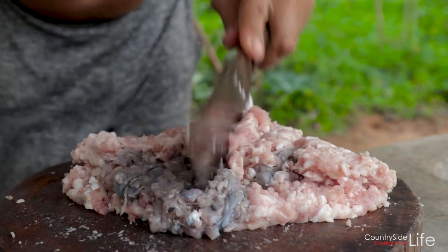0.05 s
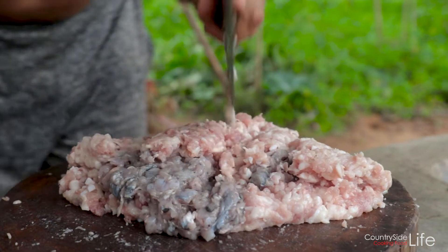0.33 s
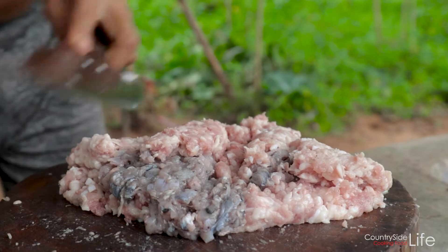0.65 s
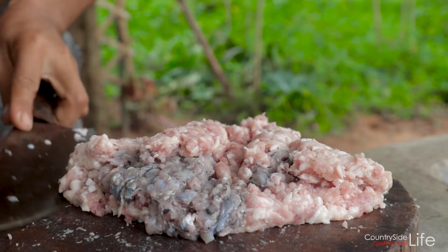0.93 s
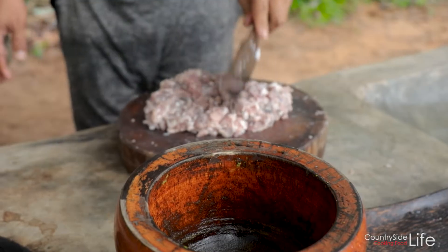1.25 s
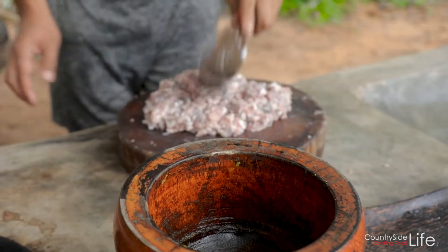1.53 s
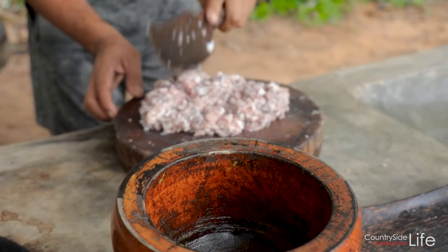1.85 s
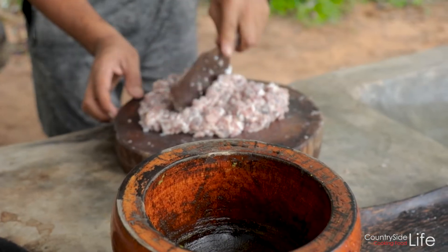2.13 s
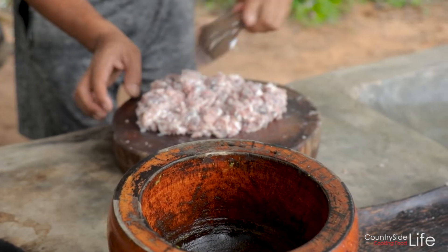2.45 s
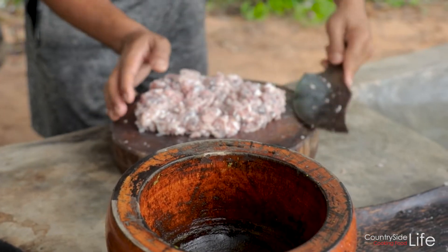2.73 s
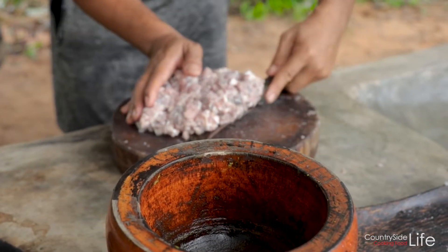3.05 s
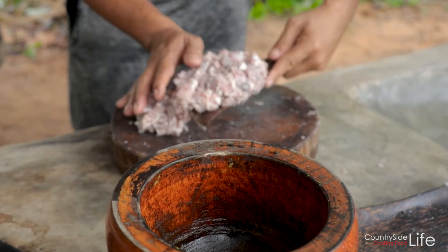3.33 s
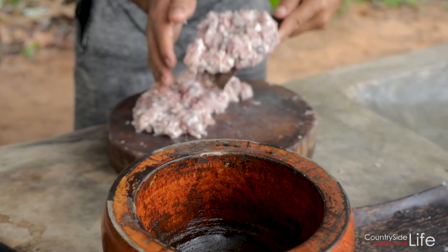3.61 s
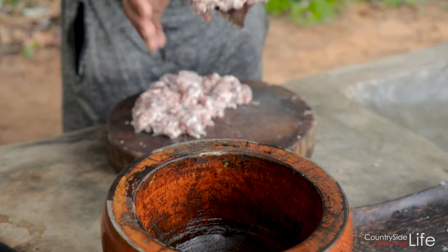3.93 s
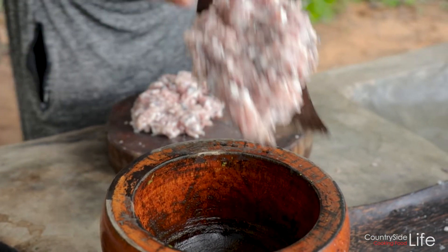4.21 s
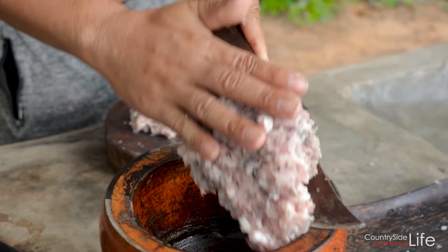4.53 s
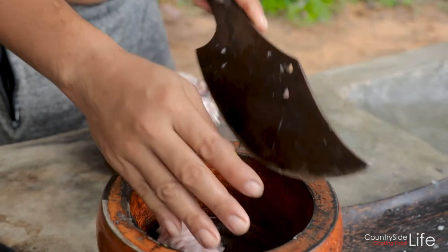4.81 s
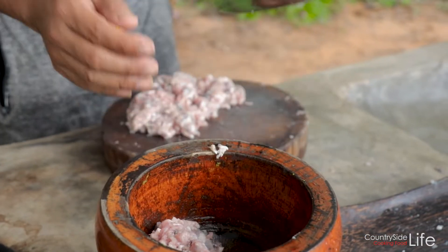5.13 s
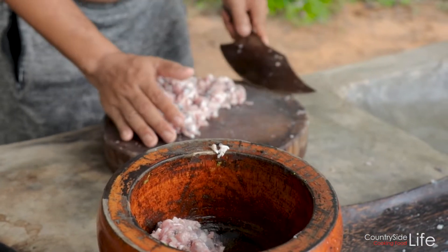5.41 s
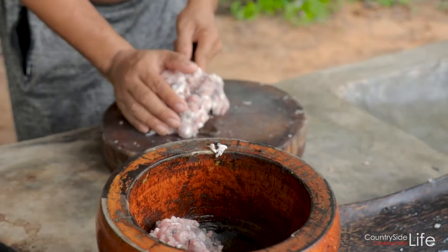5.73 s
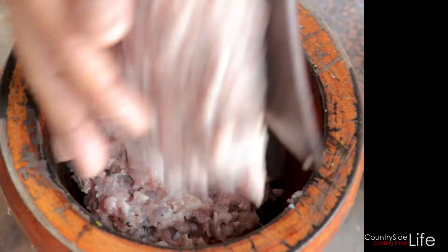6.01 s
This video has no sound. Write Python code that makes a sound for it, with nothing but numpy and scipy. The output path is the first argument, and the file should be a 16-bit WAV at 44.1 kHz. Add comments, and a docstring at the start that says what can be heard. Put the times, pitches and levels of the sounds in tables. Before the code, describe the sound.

Outdoors, over faint pulsing insects and a distant rumble, a heavy blade knocks twice through moist meat into a wooden block near the microphone. After a short pause with a metallic clink, seven fast chops of uneven strength follow. The rest is much quieter: steel drags and taps on the wood while wet mince is pushed together and wiped off the blade with soft, sticky sounds.

```python
"""A cleaver minces wet meat on a thick wooden block outdoors, in two quick runs. Each impact excites
the block's damped modes and squeezes the meat; the hardest blows clip briefly.
Between and after the runs the steel blade is set down, rings in its own modes and scrapes the
mince together by friction. Insects buzz over a faint hiss and a low distant rumble."""
import sys
import numpy as np
from scipy import signal
from scipy.fft import rfft, irfft, next_fast_len
from scipy.io import wavfile
from scipy.ndimage import uniform_filter1d

SR = 44100
rng = np.random.default_rng(int(sys.argv[2]) if len(sys.argv) > 2 else 0)


def generate_wav(signal):
    """Clip the signal to [-1, 1] and save it as 16-bit WAV at the path in sys.argv[1]."""
    frames = np.transpose(np.atleast_2d(signal))
    scaled = np.clip(frames, -1, 1) * 32767
    pcm = np.round(scaled).astype(np.int16)
    wavfile.write(sys.argv[1], SR, pcm)


N = 267674
T = np.arange(N) / SR

# chops through the meat:
# t/s, strength/dB, f_contact/Hz, after-ring/dB, sharp treble crack just after impact/dB, squelch/dB
CHOPS = [(0.223, 1.5, 1563, -1, -14.5, -29), (0.4352, -8, 1889, 2, -47, -38),
         (1.2190, -13.5, 1570, 1, -57, -38), (1.3972, 0.5, 1612, 1.5, -18.5, -38.5),
         (1.5980, -11, 1627, 4, -16, -32.5), (1.7922, -8, 1310, -0.5, -42, -34),
         (1.9748, 5.5, 1600, -2, -11, -35.5), (2.168, 0, 1492, 1.5, -22, -38),
         (2.3498, -3.5, 1340, 2, -19, -38.5)]
# normal modes of the wooden block: f/Hz, level/dB, t60/s
BLOCK_MODES = [(174, -26.5, .1), (215, -35.5, .09), (287, -30.5, .08), (365, -23.5, .08), (477, -30, 0.12),
               (632.2, -22, 0.08), (683, -22.5, 0.055), (800, -13, 0.051), (853.7, -16.5, 0.066),
               (1064, -21, 0.064), (1269, -25, .06), (1279.7, -18.5, 0.063), (1568, -14, 0.05),
               (1744, -15, 0.037), (1872, -20, 0.049), (2060, -23, 0.013), (2148, -24.5, 0.034),
               (2250, -30, .06), (2560, -20, 0.074), (2920, -32.5, 0.083), (3170, -32, 0.055),
               (3660, -39, .07), (3820, -35.5, 0.012), (4546, -33.5, .04)]
# normal modes of the steel blade: f/Hz, level/dB, t60/s
BLADE_MODES = [(582.7, 4, 0.096), (1428, 5.5, 0.17), (1560, 9, 0.033), (2154, 0, 0.14), (2670, 18.5, 0.019),
               (2960, 6, 0.057), (3438, 4, 0.14), (3920, -1.5, 0.16), (4046, 1, 0.22), (4490, 4, 0.1),
               (5500, -10, 0.12), (6850, -2, 0.11), (8290, 11, 0.043), (8260, -5, 0.067),
               (9330, -5.5, 0.1572), (9741, -7, .07), (11300, -4, 0.05), (11780, -19, 0.09),
               (13390, -22.5, .08), (14736, -18.5, .07)]
# spectrum of steel rubbing on wood: f/Hz, spectral level/dB
FRICTION_SPECTRUM = [(200, -18), (450, -2.5), (800, -5), (1100, -2.5), (1500, -7), (2500, -5), (4500, -6),
                     (5600, -10), (9000, -7.5), (15000, -9.5)]
# spectrum of wet crackle: f/Hz, spectral level/dB
WET_SPECTRUM = [(400, -9), (1500, -1.5), (4000, -3), (6500, -1.5), (10500, 1), (15500, -8.5)]
# left-right coherence of sound from the block: f/Hz, correlation
BLOCK_COHERENCE = [(50, .99), (250, .97), (500, .9), (1000, .85), (2000, .6), (4000, .35), (12000, .2)]


def chops():
    """Impact excitation: each blow knocks and rings the block; reflection and scattering follow."""
    # sound scattered by the table, mortar and yard: f/Hz, spectral level/dB
    scatter = [(130, -13.5), (400, -4), (800, -1.5), (1700, -6), (2600, -4.5), (3900, -10.5), (5200, -28.5),
               (10000, -28), (16000, -34.5)]
    echo_s, build_s, crack_delay_s = .0103, .0005, .001
    out, t = np.zeros((2, N)), T[:SR * 2 // 5]
    for s, db, contact_hz, bright_hz, ring_db, crack_db in blows():
        direct = knock(t) + bite(t, contact_hz)
        detuning = 1 + .0095 * rng.standard_normal()   # meat under the edge shifts the modes
        body = ring(BLOCK_MODES, t * detuning, vary_db=2)
        near_db = -10 - 3.5 * (t < echo_s)   # thin until the first reflection
        near = noise(scatter, len(t)) * decay(t, near_db, t60=.061)
        far = noise(scatter, len(t)) * decay(t, -41, t60=.36)
        blow = direct + (from_db(ring_db) * (body + near) + far) * (1 - np.exp(-t / build_s))
        add(blow, echo_s, from_db(ring_db - 16.5) * direct)   # ground reflection
        # a shorter contact favours higher tones
        blow = blow + from_db(-5.5) * resonate(blow, contact_hz, width_hz=1.1 * contact_hz)
        add(out, s, from_db(db) * band(blow, low_hz=186, high_hz=bright_hz))
        crack = low_pass(noise(WET_SPECTRUM, len(t)), hz=6350)
        add(out, s + crack_delay_s, decay(t, crack_db, t60=.012) * crack)
    return out


def blows():
    """Contact stiffness: harder chops are brighter. Lists the chops, then the light taps."""
    # the blade touching or bouncing on wood: t/s, strength/dB, f_contact/Hz, f_cutoff/Hz, after-ring/dB
    taps = [(0.022, -24, 500, 1810, -6), (0.2328, -12.5, 2430, 4200, 0), (0.8818, -15, 1988, 3820, 3),
            (0.9126, -28, 1500, 2200, 6), (1.056, -33, 1285, 1530, 10), (1.071, -27.5, 730, 1100, 3),
            (2.7863, -26, 1400, 3490, 1.5), (2.798, -26.5, 1350, 3000, -2),
            (3.4648, -28.5, 1230, 1900, 3.5), (3.477, -24.5, 1070, 1700, -0.5),
            (4.780, -29, 1725, 3020, -8), (5.426, -37, 3625, 4000, -1), (5.4593, -22.5, 960, 1386, -2),
            (5.716, -37, 846, 1400, -1.5)]
    chop_bright_hz, db_per_octave, tap_crack_db = 2700, 16.5, -36
    hard = [(s, db, hz, chop_bright_hz * 2 ** (db / db_per_octave), ring_db, crack_db)
            for s, db, hz, ring_db, crack_db, _ in CHOPS]
    light = [(s, db, hz, bright_hz, ring_db, db + tap_crack_db)
             for s, db, hz, bright_hz, ring_db in taps]
    return hard + light


def knock(t, rise_s=.0018, lag_s=.00003):
    """Heavy damping: block and blade swing together a few times, out of step at left and right."""
    # modes of block and blade in contact: f/Hz, relative level/dB, t60/s
    coupled_modes = [(565, -11.5, .014), (873, -9, 0.017), (1379, -2.5, 0.01), (2594, -3.5, 0.0091),
                     (4596, -1.5, .006)]
    out = 0
    for k, (hz, db, t60) in enumerate(coupled_modes):
        sign = (-1) ** k
        lag = lag_s * sign * np.array([[1], [-1]])
        out = out + sign * decay(t, db, t60) * np.sin(2 * np.pi * hz * (t + lag))
    return 2 * out * (1 - np.exp(-t / rise_s))


def bite(t, hz, contact_s=.0036):
    """Contact resonance: the blade quivers for a few cycles until its edge lodges in the wood."""
    envelope = np.sin(np.pi * np.minimum(t / contact_s, 1)) ** 2
    return from_db(-8.5) * envelope * np.sin(2 * np.pi * hz * t)


def squelches(sink_s=.007, fall_s=.0013, peel_s=.058, peel_width_s=.015, thud_rise_s=.00076):
    """Compression of wet meat: it is squeezed, thuds and spatters, then the blade peels out."""
    # the meat cushioning the blade: f/Hz, spectral level/dB
    cushion = [(110, -4), (170, -0.5), (400, 0), (800, -12.5), (2000, -20), (4500, -21.5)]
    out, t = np.zeros((2, N)), T[:SR // 5] - .05   # the edge meets wood at t = 0
    for s, *_, squelch_db in CHOPS:
        squeeze = np.exp(np.minimum(t / sink_s, -t / fall_s))
        spatter = decay(np.abs(t), -7, t60=.1) * (t > 0)
        peel = from_db(-18.5) * np.exp(-((t - peel_s) / peel_width_s) ** 2)
        crackle = noise(WET_SPECTRUM, len(t)) * grain(per_s=2400, depth_db=6.5, size=len(t))
        thud = noise(cushion, len(t)) * np.minimum(np.exp(t / thud_rise_s), decay(t, 0, t60=.09))
        squelch = (squeeze + spatter + peel) * crackle + from_db(7.5) * thud
        add(out, s + t[0], from_db(squelch_db) * squelch)
    return out


def clinks():
    """Free vibration: with little meat to damp it, the blade clacks and rings."""
    # bare steel touching wood: t/s, level/dB, damping by hand and meat (1 = free)
    touches = [(0.8825, -32, 1.03), (2.785, -47, 1.54), (3.464, -60.5, 1.4), (5.424, -57.5, 7.5)]
    out, t = np.zeros((2, N)), T[:SR // 2]
    for s, db, damping in touches:
        clack = noise(FRICTION_SPECTRUM, len(t)) * decay(t, -4.5, t60=.059)
        steel = ring(BLADE_MODES, t, vary_db=0, damping=damping)
        add(out, s, from_db(db) * (steel + clack))
    return out


def scrapes():
    """Sliding friction: the edge rubs on wood and each blade mode catches and lets go by itself."""
    # drags of the blade, duller the flatter it lies:
    # t_start/s, t_peak/s, t_end/s, level/dB, f_cutoff/Hz, steel ring/dB, fade before lifting/dB
    drags = [(0.971, 1.045, 1.056, -39, 13480, 5, 4), (2.964, 2.992, 2.964, -45.5, 6500, 11, 9.5),
             (3.461, 3.494, 3.606, -45.5, 3270, 12, 14), (3.819, 3.818, 3.95, -50.5, 5000, 4, 12.5),
             (3.946, 3.965, 4.08, -53, 7100, 3, 14), (4.325, 4.337, 4.36, -54, 4020, 0.5, 9),
             (4.769, 4.784, 4.8, -48, 4000, 15, 13), (5.486, 5.547, 5.79, -43, 14540, 9, 16),
             (5.602, 5.627, 5.72, -43.5, 3470, 6, 15)]
    rub = noise(FRICTION_SPECTRUM) * grain(per_s=680, depth_db=3.5)
    steel = sum(resonate(rub * grain(per_s=50, depth_db=3.5), hz, width_hz=43 + .01051 * hz)
                for hz, _, _ in BLADE_MODES)
    out = 0
    for *push, cutoff_hz, steel_db, fade_db in drags:
        scrape = low_pass(rub + from_db(steel_db) * steel, cutoff_hz, order=4)
        out = out + stroke(*push, rise_db=7.5, fall_db=fade_db) * unit_rms(scrape)
    return out


def judder():
    """Stick-slip: uneven slips of the edge drive the block's modes, most near the stroke's pitch."""
    # the edge pressed along the wood: t_start/s, t_knee/s, t_end/s, level/dB, f/Hz
    presses = [(3.466, 3.476, 3.59, -45, 860), (5.478, 5.582, 5.74, -49.5, 686)]
    slips = noise(FRICTION_SPECTRUM) * grain(per_s=330, depth_db=6)
    wood = sum(from_db(db) * resonate(slips, hz, width_hz=81) for hz, db, _ in BLOCK_MODES)
    return sum(stroke(*push, rise_db=-1.5, fall_db=12) * unit_rms(resonate(wood, hz, width_hz=460))
               for *push, hz in presses)


def mince():
    """Adhesion: sticky mince crackles as it is handled, strands snap and the heap thumps softly."""
    # mince pushed, lifted or wiped off the blade: t_start/s, t_peak/s, t_end/s, relative level/dB
    smears = [(0.0, 0.016, 0.035, -41.5), (0.037, 0.113, 0.27, -55), (2.888, 3.017, 3.14, -53.5),
              (3.231, 3.434, 3.73, -61.5), (3.62, 3.656, 3.7, -65), (3.907, 3.937, 4.21, -55.5),
              (4.605, 4.7, 4.98, -60), (5.146, 5.192, 5.2, -61), (5.936, 6.019, 6.24, -55)]
    # strands snapping off the blade: t/s, level/dB
    snaps = [(0.012, -46), (1.387, -46), (1.769, -39.5), (3.15, -41.5), (3.164, -43.5), (4.686, -46.5),
             (4.712, -45), (4.822, -39)]
    # thumps of the heap: t/s, level/dB, f/Hz, t60/s
    thumps = [(0.023, -19.5, 505, 0.022), (1.071, -27, 397, 0.028), (3.473, -27, 292, 0.056)]
    handling = from_db(3.5) * sum(stroke(*push, rise_db=9, fall_db=10.5) for push in smears)
    out = handling * noise(WET_SPECTRUM) * grain(per_s=1300, depth_db=4) * grain(per_s=110, depth_db=2)
    t = T[:SR // 4]
    for s, db in snaps:
        snap = band(noise(WET_SPECTRUM, len(t)), low_hz=5990, high_hz=15000)
        add(out, s, decay(t, db, t60=.017) * snap)
    for s, db, hz, t60 in thumps:
        add(out, s, decay(t, db, t60) * np.sin(2 * np.pi * hz * t))
    return out


def chirping_insect(chirps_per_s=5.4, first_s=.13):
    """Amplitude modulation: an insect pulses its buzz at a steady pace and wavering strength."""
    # the insect's slow changes of strength: t/s, relative level/dB
    strength = [(0, -0.5), (3.2, 2), (4.4, -7), (6.1, -5)]
    pulses = np.clip(.67 + np.cos(2 * np.pi * chirps_per_s * (T - first_s)), 0, 1)
    waver = grain(per_s=24, depth_db=2)
    return from_db(-67) * level(strength) * pulses * waver * buzz(hz=5940, width_hz=330)


def calling_insect(first_s=2.23, period_s=.503, length_s=.24, swell_s=.092, fade_s=.051):
    """Slow amplitude modulation: a higher insect calls seven times, each call louder than the last."""
    calls = 0
    for k in range(7):
        start = first_s + k * period_s
        end, db = start + length_s, -69 + 1.9 * k
        calls = calls + level([(start - swell_s, db - 18), (start + swell_s, db),
                               (end, db - .5), (end + fade_s, db - 18)])
    return calls * buzz(hz=9070, width_hz=580)


def buzz(hz, width_hz):
    """Narrow-band noise: an insect's rasp around one frequency."""
    return noise([(hz - 2 * width_hz, -30), (hz - width_hz, -14), (hz, 0),
                  (hz + width_hz, -14), (hz + 2 * width_hz, -30)])


def yard():
    """Ambient field: insects over hiss and distant rumble, which lose coherence towards the treble."""
    # background hiss: f/Hz, spectral level/dB
    hiss_spectrum = [(200, -3), (330, -2.5), (600, -6), (1100, -9.5), (1450, -8), (2500, -13),
                     (5200, -15.5), (7500, -16.5), (11500, -15), (13500, -9.5), (14700, -15),
                     (17000, -25.5)]
    # level of the hiss over time, louder after 1.1 s: t/s, relative level/dB
    hiss_level = [(0, -2.5), (1.1, 1), (1.2, 2), (5.8, 1), (5.87, 2), (6.2, -0.5)]
    # distant rumble: f/Hz, spectral level/dB
    rumble_spectrum = [(20, -30.5), (42, -23), (56, 3.5), (76, -7), (105, -3.5), (125, 1), (150, -7.5),
                       (185, -11), (208, -8), (245, -20.5), (330, -33)]
    # left-right coherence of the yard: f/Hz, correlation
    coherence = [(60, .985), (130, .96), (230, .87), (420, .35), (1000, .35), (2000, .2), (4000, .03)]
    hiss = from_db(-57) * level(hiss_level) * noise(hiss_spectrum, coherence=coherence)
    insects = chirping_insect() + calling_insect()
    rumble = from_db(-50) * noise(rumble_spectrum, coherence=coherence)
    return pan(hiss + insects, left_db=-.5321) + pan(rumble, left_db=.7)


def ring(modes, t, vary_db, damping=1):
    """Modal superposition: damped sines of alternating sign, whose levels vary with the point struck."""
    hz, db, t60 = np.transpose(modes)[:, :, None]
    index = np.arange(len(hz))[:, None]
    struck_db = db + vary_db * rng.standard_normal(hz.shape)
    gain = (-1) ** index * decay(damping * t, struck_db, t60)
    # high modes reach the two sides out of step
    phase = np.arccos(at_hz(BLOCK_COHERENCE, hz)) * (-1) ** (index // 2) / 2
    return np.array([np.sum(gain * np.sin(2 * np.pi * hz * t + side * phase), axis=0)
                     for side in (1, -1)])


def noise(spectrum, size=N, coherence=BLOCK_COHERENCE):
    """Partial coherence: coloured stereo noise, alike in the bass and diffuse in the treble; rms 1."""
    n_fft = next_fast_len(size, True)
    hz = np.fft.rfftfreq(n_fft, 1 / SR)
    alike = np.clip(at_hz(coherence, hz), 0, 1)
    mid, side = rfft(rng.standard_normal((2, n_fft)))
    passband = 1 / (1 + (hz / spectrum[-1][0]) ** 16) / (1 + (spectrum[0][0] / (hz + 1)) ** 4)
    pair = np.sqrt(1 + alike) * mid + np.sqrt(1 - alike) * side * [[1], [-1]]
    return unit_rms(irfft(pair * passband * from_db(at_hz(spectrum, hz)), n_fft)[:, :size])


def grain(per_s, depth_db, size=N):
    """Random modulation: a gain that moves to a new value per_s times a second; rms 1."""
    knots = np.clip(rng.standard_normal(size), -2, 2)
    return unit_rms(from_db(depth_db * np.interp(T[:size] * per_s, np.arange(size), knots)))


def stroke(start, knee, end, db, rise_db, fall_db, attack_s=.012, release_s=.018):
    """Envelope of a hand stroke: it takes hold, reaches db at the knee, eases off and lets go."""
    return level([(start - attack_s, db - 25), (start, db - rise_db), (knee, db),
                  (end, db - fall_db), (end + release_s, db - 40)])


def level(rows):
    """Envelope through rows of t/s, level/dB; silent outside them."""
    s, db = np.transpose(rows)
    return from_db(np.interp(T, s, db, left=-150, right=-150))


def decay(t, db, t60):
    """Exponential decay from db, by 60 dB in t60 seconds."""
    return from_db(db - 60 * t / t60)


def resonate(x, hz, width_hz):
    """Second-order resonance with unit peak gain."""
    return signal.lfilter(*signal.iirpeak(hz, hz / width_hz, SR), x)


def band(x, low_hz, high_hz):
    """Band-pass with first-order slopes."""
    sos = signal.butter(1, [low_hz, min(high_hz, .45 * SR)], "band", fs=SR, output="sos")
    return signal.sosfilt(sos, x)


def low_pass(x, hz, order=1):
    """Attenuation above a cutoff."""
    return signal.sosfilt(signal.butter(order, min(hz, .45 * SR), fs=SR, output="sos"), x)


def add(out, s, sound):
    """Superposition of a sound from time s."""
    at = round(s * SR)
    sound = sound[..., max(-at, 0):out.shape[-1] - at]
    out[:, max(at, 0):max(at, 0) + sound.shape[-1]] += sound


def pan(x, left_db):
    """Level difference: the left gains left_db and the right loses as much."""
    return x * from_db([[left_db], [-left_db]])


def at_hz(points, hz):
    """Interpolation on a log-frequency axis."""
    known, values = np.transpose(points)
    return np.interp(np.log(hz + 1), np.log(known), values)


def from_db(db):
    """Level to amplitude ratio."""
    return 10 ** (np.asarray(db) / 20)


def unit_rms(x):
    """Normalisation to rms 1."""
    return x / np.sqrt(np.mean(x ** 2) + 1e-20)


def scene():
    """Superposition: block and blade close by, the yard behind them."""
    work = chops() + squelches() + clinks() + scrapes() + judder() + mince()
    return pan(work, left_db=.64) + yard()


def record(dry):
    """Clipping and band limiting: the loudest knocks clip, the level dips briefly, the top is cut."""
    dip_start_s, dip_end_s, dip_db, cutoff_hz = 5.826, 5.855, -40, 16100
    dip = uniform_filter1d(1.0 * ((T > dip_start_s) & (T < dip_end_s)), size=200)
    clipped = np.clip(dry, -1, 1) * from_db(dip_db * dip)
    return signal.sosfilt(signal.ellip(12, .1, 90, cutoff_hz, fs=SR, output="sos"), clipped)


dry = scene()
out = record(dry)
generate_wav(out)
```